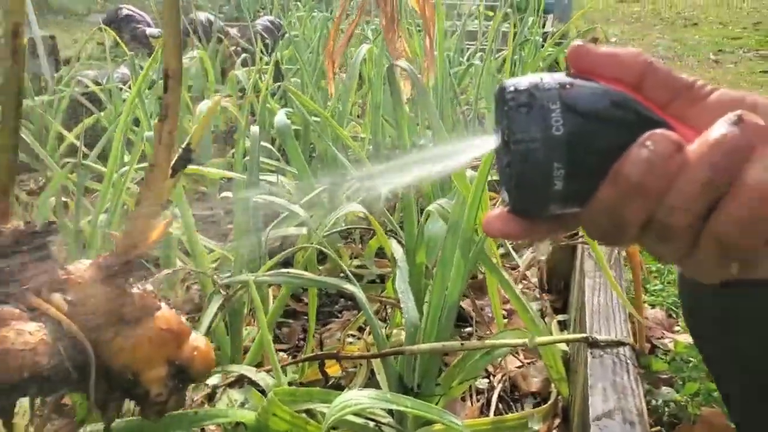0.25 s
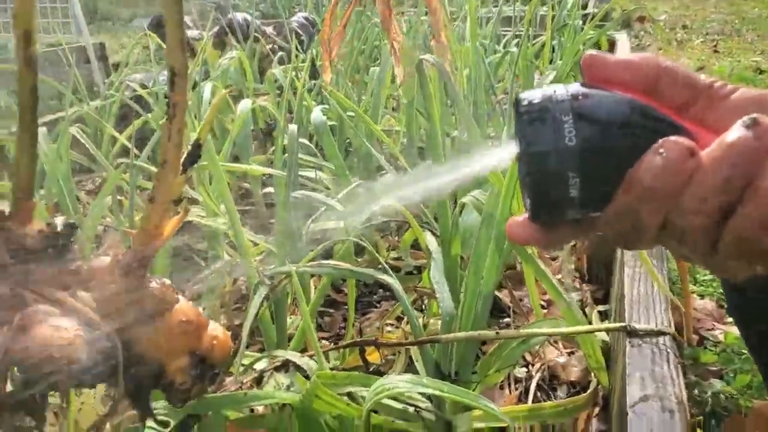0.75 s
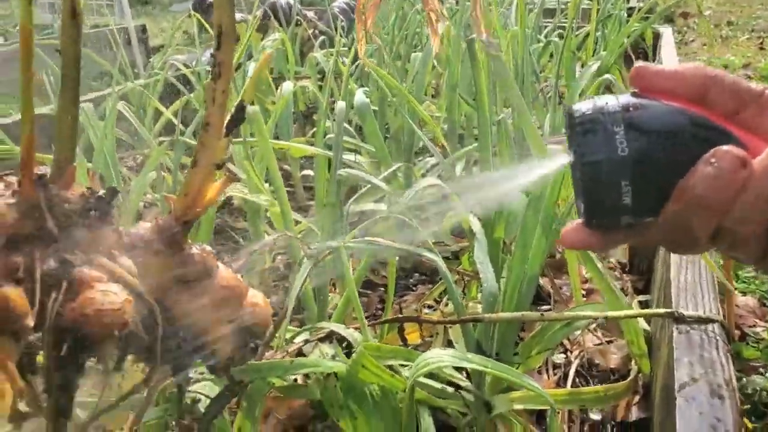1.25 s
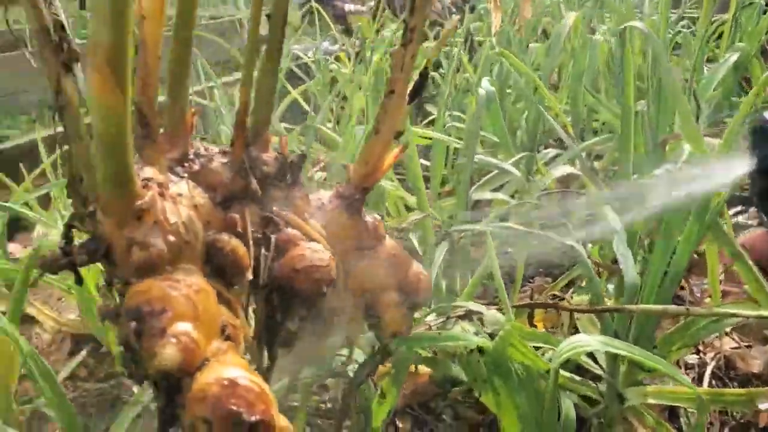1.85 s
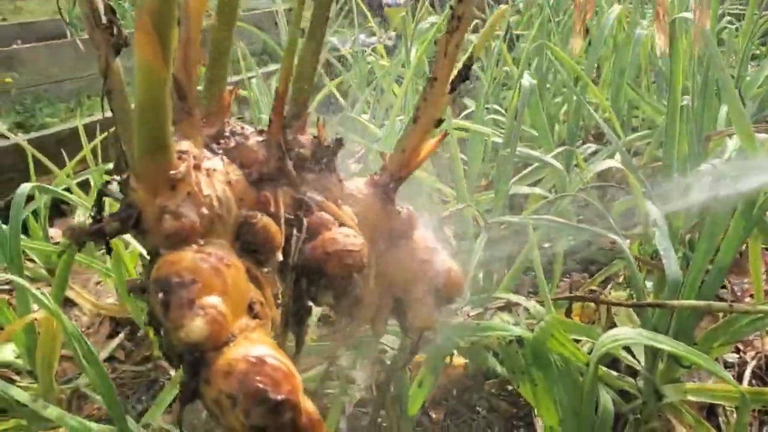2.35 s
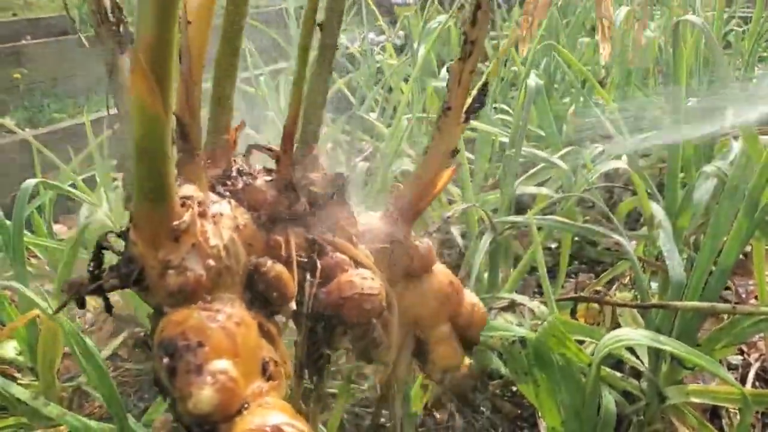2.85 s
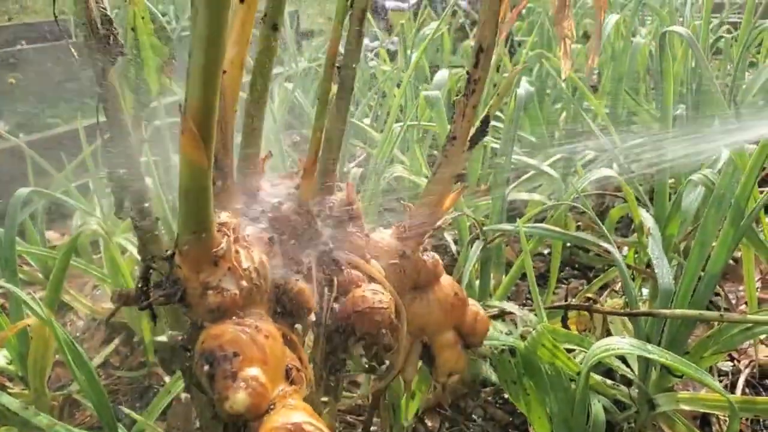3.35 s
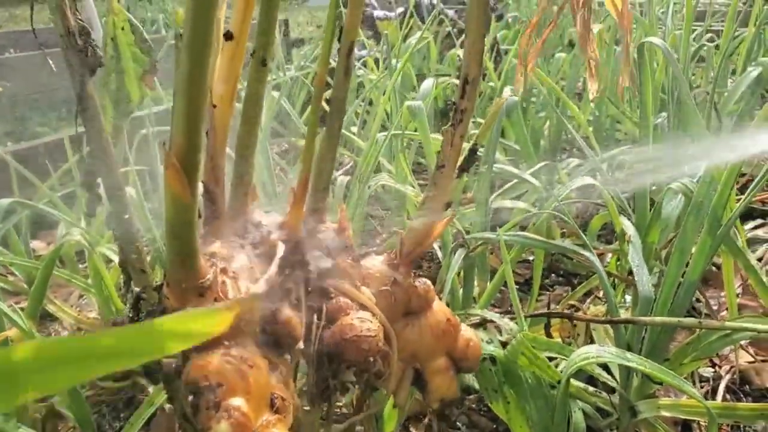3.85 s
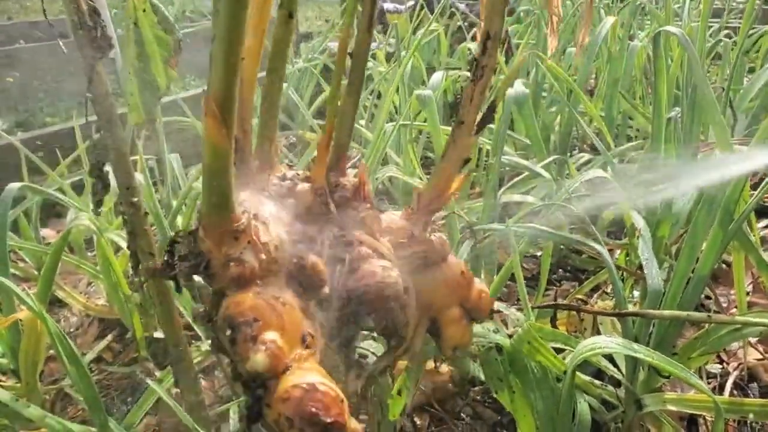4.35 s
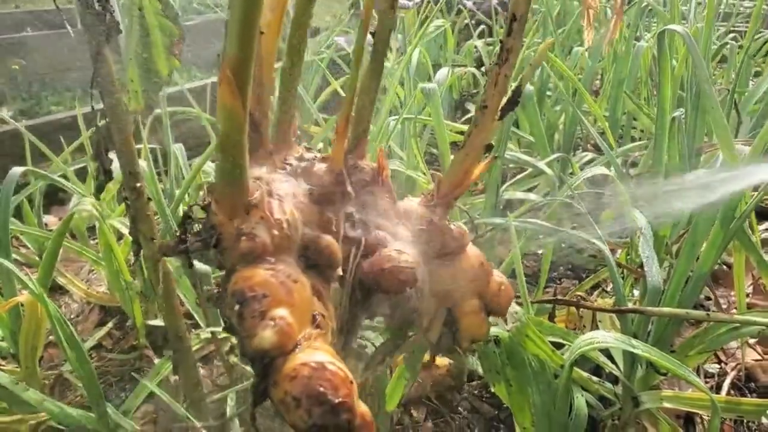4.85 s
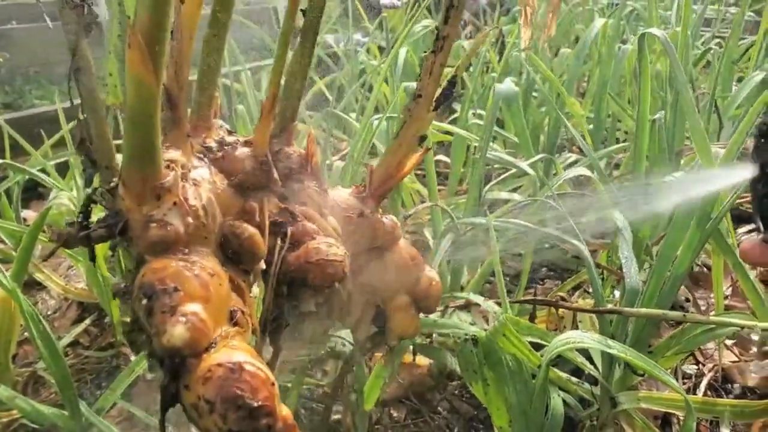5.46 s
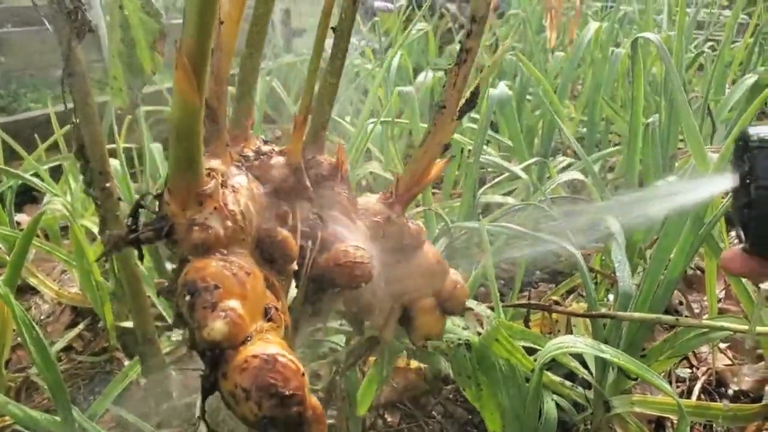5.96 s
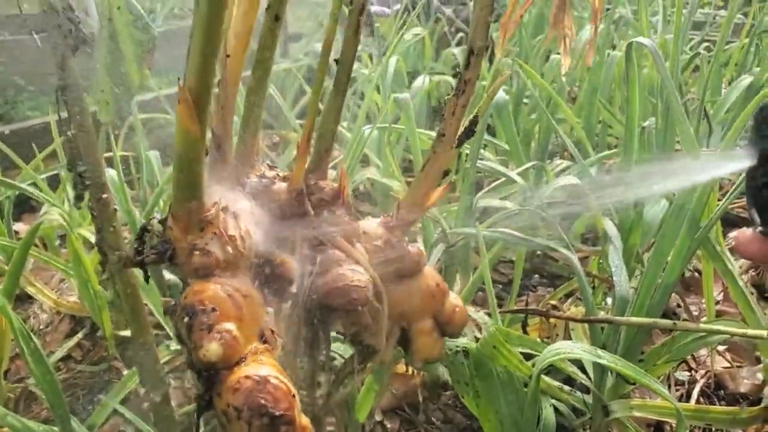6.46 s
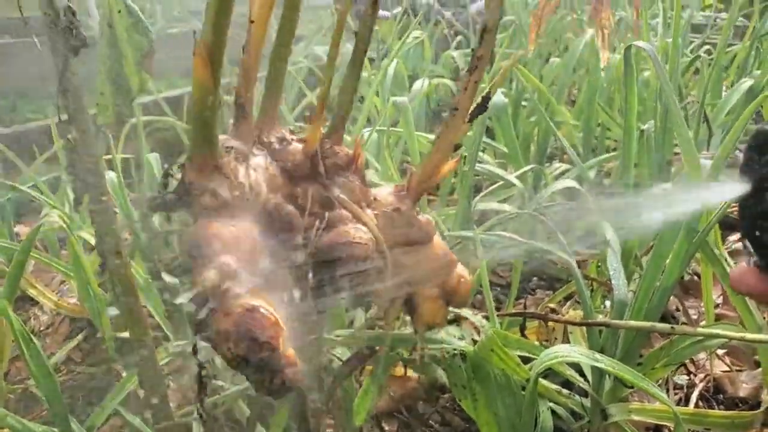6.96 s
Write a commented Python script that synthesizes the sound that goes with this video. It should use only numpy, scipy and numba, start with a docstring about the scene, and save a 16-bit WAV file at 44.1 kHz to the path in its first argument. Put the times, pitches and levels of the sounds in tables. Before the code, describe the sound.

Outdoors, a handheld microphone picks up a constant jet of water striking freshly dug roots. The close nozzle hiss, brightest on the left, eases off within two seconds; a brief splash swells near 2.8 seconds, and the impact becomes fuller. The spray then holds steady, gently swirling and fluttering, with tiny run-off drips, brief low wind bumps on the left and faint distant rumble.

```python
"""Garden: a hose nozzle sprays a clump of freshly dug roots, an arm's length from a phone with two ports.
The jet is coloured noise, the patter thousands of filtered clicks a second, the mist a high sizzle of both.
Short moving echoes off the plants make the hiss swirl as the hand draws back; run-off drips as ringing bubbles.
Behind it, low coloured noise makes a distant rumble, and short gusts of breeze buffet mainly the left port."""
import sys
import numpy as np
from scipy import signal
from scipy.fft import rfft, irfft, next_fast_len
from scipy.io import wavfile
from scipy.ndimage import uniform_filter1d, map_coordinates
from numba import njit

SR = 44100
rng = np.random.default_rng(int(sys.argv[2]) if len(sys.argv) > 2 else 0)


def digitize_waveform(pressure):
    """Quantize a signal to 16-bit integers and store it at the path in sys.argv[1].

    Rows of a 2-D input are taken as channels; values are limited to [-1, 1].
    """
    field = np.atleast_2d(pressure).T
    bounded = np.clip(field, -1, 1)
    quanta = np.round(bounded * 32767).astype(np.int16)
    wavfile.write(sys.argv[1], SR, quanta)


N = 318402

# nearness of the nozzle, drawn back from beside the phone: (time [s], level at the phone [dB])
NOZZLE_DB = [(0, 0), (.6, -1), (1.3, -3.5), (1.7, -6.5), (2.05, -17), (2.7, -17), (3.3, -15), (7.22, -12.5)]
# how squarely the jet strikes the roots: (time [s], force [dB])
STRIKE_DB = [(0, -3), (.8, -3.5), (1.65, -3), (2.3, -2.5), (2.7, -2.5), (2.77, -0.5), (3.25, 1.2),
             (3.55, 0.8), (4.45, 0), (4.54, -1.25), (5.5, -1), (6.1, -.2), (6.86, -0.2), (6.96, -1.4),
             (7.22, -1)]
# direction of the jet: (time [s], lead of the left port [ms])
JET_DIRECTION_MS = [(0, .325), (.6, .305), (1.2, .27), (1.6, .19), (2.05, 0.11), (2.7, 0.14), (3.4, 0.16),
                    (7.22, 0.18)]
# drops on wet roots, relative spectrum: (frequency [Hz], gain [dB])
PATTER_COLOUR = [(200, -28), (500, -18), (900, -18.5), (1300, -13.5), (1700, -15.5), (2100, -9.5),
                 (2650, -3.5), (3150, 0), (4700, 1), (5600, -3), (7000, -4.5), (8000, -37), (12000, -11)]
# port difference in the patter: (frequency [Hz], left minus right [dB])
PATTER_PORTS = [(300, 3), (900, 1.5), (2100, 3), (2700, 0), (3200, -2.5), (3800, 0.5), (4700, -2),
                (5500, 5), (8000, -2)]
# jet hiss, relative spectrum: (frequency [Hz], gain [dB])
JET_COLOUR = [(1500, -18), (4000, -2), (6800, 2.5), (8200, 2), (9800, 1), (12000, -2), (16000, -15)]
# jet glancing off a stem: (middle [s], length [s], extra root hiss [dB])
STEM_GLANCES = [(3.14, .2, 2.5), (6.36, .12, 2), (6.73, .24, 3.5)]
# mist, relative spectrum: (frequency [Hz], gain [dB])
MIST_COLOUR = [(6000, -28.5), (9000, -8), (11300, -2), (13000, 0), (14800, 3.5), (16000, -1)]
# mist cloud drifting sideways: (time [s], left minus right [dB])
MIST_SIDE_DB = [(0, 11), (.6, 6), (1.4, 11), (1.7, 7), (2.05, 0), (3.2, 3), (3.55, 6.5), (4.15, 6),
                (4.7, 2), (6.25, 4.5), (6.85, 10), (7.22, 9)]
# slugs of water slapping the roots: (middle [s], level [dB], Gaussian spread [s])
ROOT_SLAPS = [(2.799, -22.5, 0.019), (4.226, -27, 0.00086)]
# breeze gusts: (start [s], length [s], left level [dB], right minus left [dB])
BREEZE_GUSTS = [(1.74, 0.15, -29, -25), (1.92, 0.31, -38, -8), (2.23, 0.19, -33, -21),
                (3.53, 0.39, -35.5, -5), (3.993, 0.14, -35, -6), (4.32, .1, -40, -12),
                (4.83, .13, -35, -14), (5.077, .11, -31.5, -17), (5.262, .22, -39, -15),
                (5.593, 0.18, -36, -15), (5.973, 0.093, -37, -10), (6.498, 0.057, -36, -10),
                (7.073, 0.057, -41, -15)]
# eddies at the ports, relative spectrum: (frequency [Hz], gain [dB])
EDDY_COLOUR = [(12, -30), (28, -16), (50, 7), (80, 5.5), (130, -4.5), (200, -16), (300, -25), (600, -50),
               (2000, -90)]
# single buffets on the left port: (start [s], envelope peak [dB], pitch [Hz])
PORT_BUFFETS = [(1.741, -23.5, 139), (1.758, -24, 190), (1.808, -28, 110), (1.842, -16.5, 167),
                (1.855, -23, 150), (1.872, -22, 129), (2.391, -27, 150), (5.138, -28, 131)]
# distant outdoor rumble, relative spectrum: (frequency [Hz], gain [dB])
RUMBLE_COLOUR = [(15, -45), (32, -16), (50, -2.5), (72, 1.5), (115, -3.5), (160, -12), (230, -19),
                 (300, -19), (380, -12), (510, -24), (660, -14.5), (900, -23), (1500, -29), (5000, -64)]
# distant outdoor rumble: (time [s], level [dB])
RUMBLE_DB = [(0, -45.5), (1.2, -45.5), (2.5, -40.5), (4, -42.5), (5.2, -42), (7.22, -41.5)]

PATTER_DB = -25.5  # at a force of 0 dB
PATTER_SIDE_DB, NOZZLE_SIDE_DB = 1.35, -3.5  # left minus right
NOZZLE_HISS_DB, ROOT_HISS_DB, ROOT_HISS_DB_PER_DB = -26.5, -29.5, 1.4  # slope over force
NOZZLE_MIST_DB, ROOT_MIST_DB, ROOT_MIST_DB_PER_DB = -24.5, -22.5, 0.78
MIST_BEAM_DB_PER_DB = 2.5  # narrow beam: mist level over nozzle level
DRIFT_LOSS_DB_PER_DB = 0.19  # mist loss over sideways drift
# pairs: nozzle (drawn back, beside the phone)
ROOTS_LEAD_MS = (-.11, .01)  # lead of the left port
NEAR_ECHO_MS = (0.679, 1.64)
DIRECT_HISS_DB = (-4, 1)  # gain before mixing with scattered hiss
LOWER_COMB_HZ, UPPER_COMB_HZ, COMB_DB = (3510, 3370), (4260, 4080), (-9.5, 3.5)
COMB_WANDER_SHARE, COMB_MASKING_DB_PER_DB = 0.013, 0.65  # of the pitch; band loss over force
GUST_ATTACK_S, GUST_RELEASE_S = 0.015, 0.034
TOP_HZ = 15750


def spray():
    """Nozzle nearness and root force set level and direction of patter, hiss and mist."""
    nozzle_db, = curves(NOZZLE_DB)
    strike_db, = curves(STRIKE_DB)
    drift_db, = curves(MIST_SIDE_DB)
    jet_ms, = curves(JET_DIRECTION_MS)
    near = undb(nozzle_db)
    roots_ms = between(ROOTS_LEAD_MS, near)
    echo_ms = between(NEAR_ECHO_MS, near ** 2)

    nozzle_hiss = undb(NOZZLE_HISS_DB + nozzle_db)
    root_hiss = undb(ROOT_HISS_DB + ROOT_HISS_DB_PER_DB * strike_db + glances())
    nozzle_mist = undb(NOZZLE_MIST_DB + MIST_BEAM_DB_PER_DB * nozzle_db)
    root_mist = undb(ROOT_MIST_DB + ROOT_MIST_DB_PER_DB * strike_db)

    drops = patter(jet_ms, roots_ms, echo_ms, nozzle_db, strike_db) * undb(PATTER_DB + strike_db)
    hiss = jet(jet_ms, echo_ms, near) * np.hypot(nozzle_hiss, root_hiss)
    sizzle = mist(jet_ms) * np.hypot(nozzle_mist, root_mist) * undb(-DRIFT_LOSS_DB_PER_DB * drift_db)
    return (drops * pan(np.full(N, PATTER_SIDE_DB))
            + hiss * pan(NOZZLE_SIDE_DB * near)
            + sizzle * pan(drift_db))


def patter(jet_ms, roots_ms, echo_ms, nozzle_db, strike_db):
    """Jet drops strike the roots and scatter; two coloured bands, as echoes comb them, wander in pitch."""
    tearing = impacts(per_second=26000, spread_db=1.2)
    tearing = tearing + undb(nozzle_db + 7.5) * resonance(tearing, np.full(N, 2080.), 220.)
    tearing = undb(-2.5) * from_spot(tearing, jet_ms)
    struck = undb(-1.5) * from_spot(impacts(per_second=14000, spread_db=2.0), roots_ms)
    scattered = undb(-2.5) * shower(per_second=16000, spread_db=2.5, half_width_ms=.45, lead_ms=.28)
    water = scattered + among_plants(tearing + struck, echo_ms,
                                     near_db=-12, far_db=-9, far_ms=1.9, sway=0.0531)

    beside = undb(nozzle_db) ** 2
    lower_hz = between(LOWER_COMB_HZ, beside) * (1 + COMB_WANDER_SHARE * walk(1.42))
    upper_hz = between(UPPER_COMB_HZ, beside) * (1 + COMB_WANDER_SHARE * walk(1.42))
    bands = np.array([resonance(x, lower_hz, 270.0) + resonance(x, upper_hz, 280.0) for x in water])
    bands_db = between(COMB_DB, beside ** 2) - COMB_MASKING_DB_PER_DB * strike_db
    water = water + undb(bands_db) * bands
    return steady(colour(flicker(water, depth_db=1.5, rate_hz=34, count=8), PATTER_COLOUR, PATTER_PORTS))


def jet(jet_ms, echo_ms, near):
    """Turbulent hiss of the fan of water, direct and off the plants; more direct when the nozzle is near."""
    direct = among_plants(from_spot(rng.standard_normal(N), jet_ms), echo_ms,
                          near_db=-18, far_db=-8, far_ms=1.7, sway=0.063)
    scattered = shower(per_second=27000, spread_db=3.0, half_width_ms=.45)
    hiss = undb(between(DIRECT_HISS_DB, near)) * direct + scattered
    return steady(colour(hiss, JET_COLOUR)) * undb(1.0 * walk(40))


def glances():
    """Extra hiss in dB: a rounded swell each time the jet crosses a stem."""
    t = np.arange(N) / SR
    return sum(db * np.exp(-(2 * (t - s) / length_s) ** 2) for s, length_s, db in STEM_GLANCES)


def mist(jet_ms):
    """The finest drops sizzle on roots and leaves: dense clicks with a little noise."""
    direct = undb(-15.0) * from_spot(rng.standard_normal(N), jet_ms)
    sizzle = direct + shower(per_second=30000, spread_db=2.5, half_width_ms=.45)
    return level(colour(sizzle, MIST_COLOUR)) * undb(0.79 * walk(60))


def slaps():
    """Short swells of splash as the jet catches a knob of root."""
    t = np.arange(N) / SR
    swell = sum(undb(db) * np.exp(-((t - s) / spread_s) ** 2 / 2) for s, db, spread_s in ROOT_SLAPS)
    splash_colour = [(1000, -34), (2800, -8), (4400, 5), (6000, -18), (9000, -13), (14500, -9)]  # (Hz, dB)
    splash = colour(shower(per_second=20000, spread_db=0, half_width_ms=0.086), splash_colour)
    return swell * level(splash)


def drips(low_hz, high_hz, cycles, spread_db, count=1400):
    """Run-off traps small bubbles that ring for a few cycles, rising in pitch."""
    out = np.zeros((2, N))
    for when, pitch, size, side in rng.random((count, 4)):
        hz = low_hz * (high_hz / low_hz) ** pitch
        start = int(when * N)
        length = min(int(cycles * SR / hz), N - start)
        turn = np.arange(length) * hz / SR
        age = turn / cycles
        fade = np.exp(-np.log(100) * age)
        ring = np.sin(2 * np.pi * turn * (1 + 0.16 * age)) * fade
        out[:, start:start + length] += np.sqrt([[side], [1 - side]]) * ring * undb(spread_db * size ** 2)
    return level(out)


def breeze():
    """Gusts rise, hold and die; eddies rumble on each port separately, the right one sheltered."""
    t, strength = np.arange(N) / SR, 0
    for s, length_s, db, right_db in BREEZE_GUSTS:
        rise = np.clip((t - s) / GUST_ATTACK_S, 0, 1)
        fall = np.exp(-np.maximum(t - s - length_s, 0) / GUST_RELEASE_S)
        strength = strength + rise * fall * undb([[db], [db + right_db]])
    return strength * level(colour(rng.standard_normal((2, N)), EDDY_COLOUR))


def buffets(peak_s, flutter_db, right_db, size=4096):
    """A strong eddy shoves the left port, flutters and dies within a cycle or two."""
    flutter_colour = [(80, -20), (170, 8.5), (300, -5.0), (550, -17.5), (1100, -45), (5000, -90)]  # (Hz, dB)
    flutter = level(colour(rng.standard_normal(N), flutter_colour))
    out, age_s = np.zeros(N), np.arange(size) / SR
    envelope = age_s / peak_s * np.exp(1 - age_s / peak_s)
    for s, db, hz in PORT_BUFFETS:
        span = slice(int(s * SR), int(s * SR) + size)
        shove = np.sin(2 * np.pi * hz * age_s) + undb(flutter_db) * flutter[span]
        out[span] += undb(db) * shove * envelope
    return np.array([out, undb(right_db) * out])


def distance():
    """Far-off rumble: low noise, nearly the same at both ports."""
    distance_db, = curves(RUMBLE_DB)
    air = rng.standard_normal(N) + undb(-12.5) * rng.standard_normal((2, N))
    return level(colour(air, RUMBLE_COLOUR)) * undb(distance_db)


def impacts(per_second, spread_db):
    """Random clicks, most of them small, a few large; rms 1."""
    hit = rng.random(N) < per_second / SR
    size_db = spread_db * np.minimum(rng.exponential(size=N), 7)
    return level(hit * undb(size_db) * rng.choice([-1, 1], N))


def shower(per_second, spread_db, half_width_ms, lead_ms=0):
    """Drops land all around a direction: each has its own delay between the ports."""
    drops = impacts(per_second, spread_db)
    late_ms = lead_ms + half_width_ms * rng.uniform(-1, 1, N)
    arrival = np.arange(N) + np.round(late_ms * SR / 1000).astype(int)
    return level(np.array([drops, np.bincount(arrival % N, drops, N)]))


def from_spot(x, lead_ms):
    """A point source reaches the right port later than the left by lead_ms."""
    source_index = np.arange(N) - lead_ms * SR / 1000
    return np.array([x, map_coordinates(x, [source_index], order=3, mode="mirror")])


def among_plants(pair, echo_ms, near_db, far_db, far_ms, sway, count=2):
    """Each port also hears a near echo off the roots and later ones off swaying leaves."""
    out = []
    for x, stretch in zip(pair, (1, .88)):
        leaves = 0
        for k in range(count):
            leaf_ms = far_ms * stretch * np.sqrt(1 + 2 * k) * (1 + sway * walk(0.701))
            leaves = leaves + (-1) ** k * delay(x, leaf_ms)
        out.append(x + undb(near_db) * delay(x, echo_ms * stretch) + undb(far_db) * leaves)
    return np.array(out)


def delay(x, ms):
    """Read a sound a moving time later; linear interpolation dulls it a little."""
    now = np.arange(N)
    return np.interp(now - ms * (SR / 1000), now, x)


@njit
def resonance(x, hz, width_hz):
    """State-variable band-pass with a moving centre, gain 1 there."""
    y, band, low = np.empty(len(x)), 0., 0.
    for i in range(len(x)):
        g, k = np.tan(np.pi * hz[i] / SR), width_hz / hz[i]
        v = (band + g * (x[i] - low)) / (1 + g * (g + k))
        band, low, y[i] = 2 * v - band, low + 2 * g * v, k * v
    return y


def colour(x, points, sides=None):
    """Filter by a (Hz, dB) shape and, if given, a (Hz, left minus right dB) shape."""
    size = next_fast_len(N, real=True)
    log_hz = np.log(np.fft.rfftfreq(size, 1 / SR) + 1)

    def shape_db(table):
        hz, db = np.transpose(table)
        return np.interp(log_hz, np.log(hz), db)

    gain = undb(shape_db(points))
    if sides is not None:
        gain = gain * pan(shape_db(sides))
    return irfft(rfft(x, size) * gain, size)[..., :N]


def flicker(x, depth_db, rate_hz, count=9):
    """Each half-octave of a sound swells and fades on its own."""
    size = next_fast_len(N, real=True)
    spectrum = rfft(x, size)
    hz = np.fft.rfftfreq(size, 1 / SR) + 1
    place = np.clip(count - 1 + 2 * np.log2(hz / TOP_HZ), 0, count - 1)
    out = 0
    for k in range(count):
        band = irfft(spectrum * np.maximum(1 - abs(place - k), 0), size)[:, :N]
        out = out + band * undb(depth_db * walk(rate_hz))
    return out


def walk(rate_hz):
    """Random knots joined by lines, rate_hz knots a second, spread near 1."""
    knots = rng.standard_normal(8192)
    return np.interp(np.arange(N) * (rate_hz / SR), np.arange(len(knots)), knots) * np.sqrt(3 / 2)


def pan(db):
    """Left and right gains for a level difference over time or frequency, mean power 1."""
    return undb(np.array([db, -db]) / 2) / np.sqrt(np.cosh(db * np.log(10) / 20))


def steady(pair, span_s=0.19):
    """Scale to rms 1 over each short stretch of time."""
    return pair / np.sqrt(uniform_filter1d(np.mean(pair ** 2, axis=0), int(span_s * SR)))


def level(x):
    """Scale to rms 1."""
    return x / np.sqrt(np.mean(x ** 2))


def undb(db):
    """Decibels to gain."""
    return 10 ** (np.asarray(db) / 20)


def between(ends, share):
    """Go from the first value to the second as share goes from 0 to 1."""
    return ends[0] + (ends[1] - ends[0]) * share


def curves(table):
    """Each column of a timed table, sample by sample."""
    s, *columns = np.transpose(table)
    return [np.interp(np.arange(N) / SR, s, c) for c in columns]


def scene():
    """All layers of the spray share the tremor of the hand and the sputter of the jet as it breaks up."""
    sputter = undb(0.38 * walk(7) + 0.12 * walk(30) + 0.56 * walk(350))
    run_off = undb(-55) * drips(low_hz=848, high_hz=4200, cycles=8.9, spread_db=11.0)
    wind = breeze() + buffets(peak_s=0.0047, flutter_db=-6, right_db=-36)
    return spray() * sputter + slaps() + run_off + wind + distance()


def record(dry):
    """The phone cuts the top steeply: elliptic low-pass."""
    return signal.sosfilt(signal.ellip(12, .2, 85, TOP_HZ, fs=SR, output="sos"), dry)


dry = scene()
out = record(dry)
digitize_waveform(out)
```